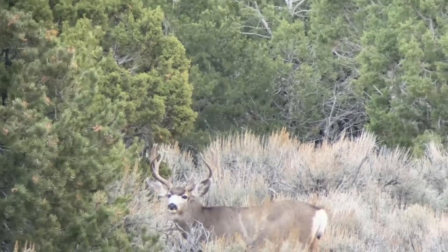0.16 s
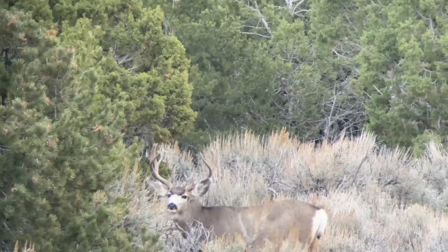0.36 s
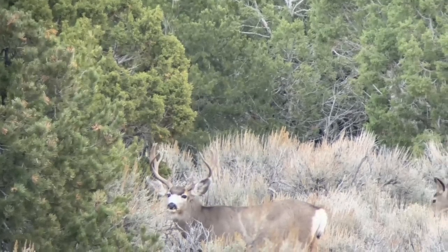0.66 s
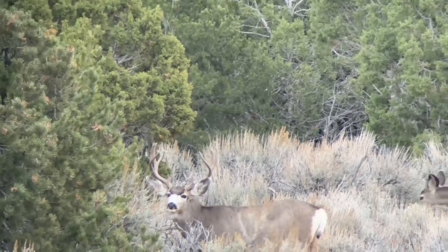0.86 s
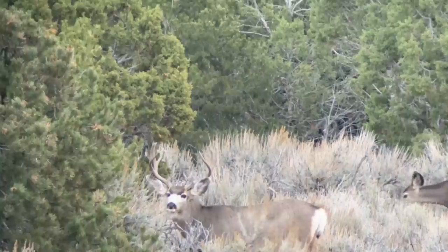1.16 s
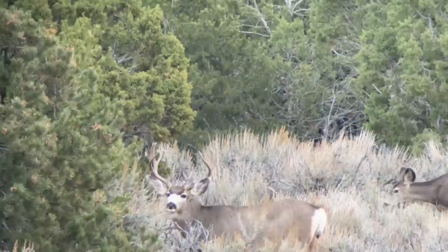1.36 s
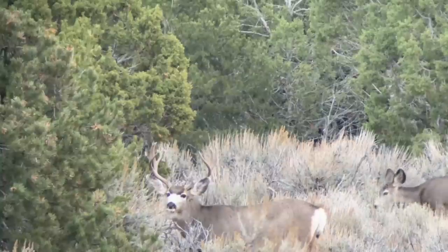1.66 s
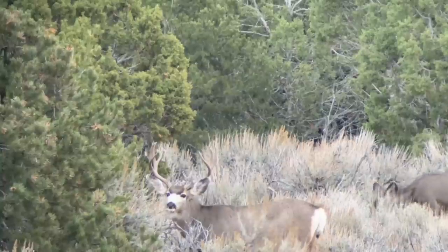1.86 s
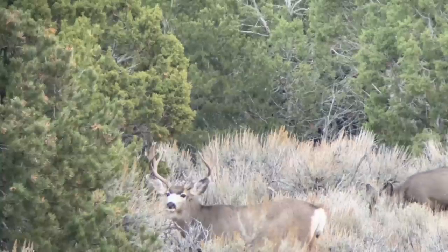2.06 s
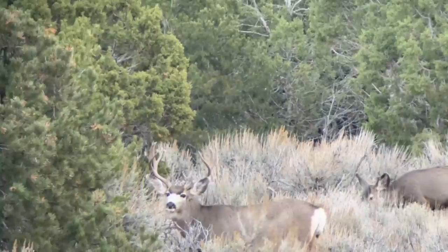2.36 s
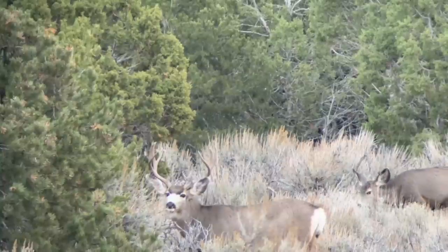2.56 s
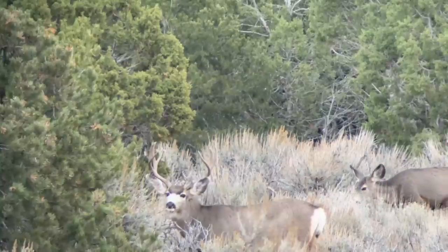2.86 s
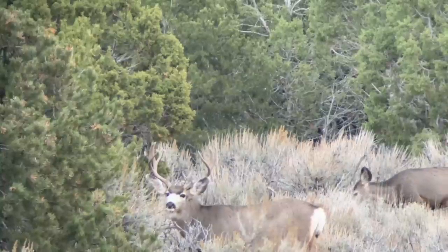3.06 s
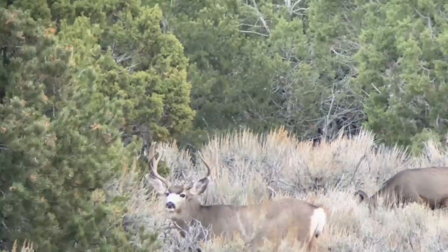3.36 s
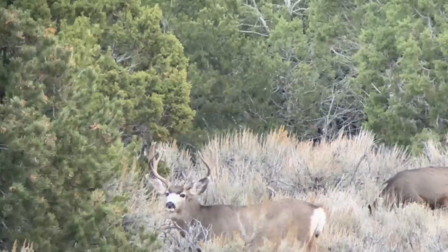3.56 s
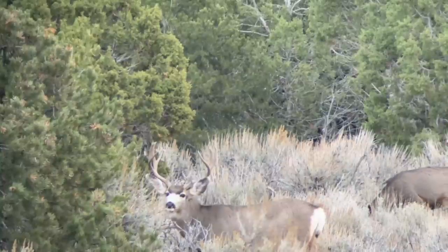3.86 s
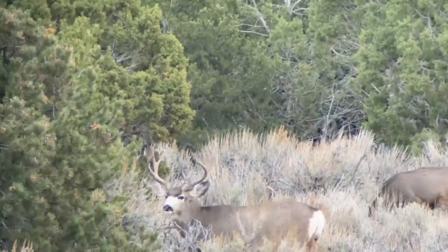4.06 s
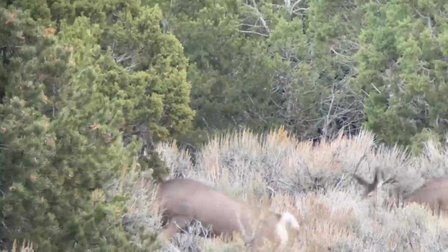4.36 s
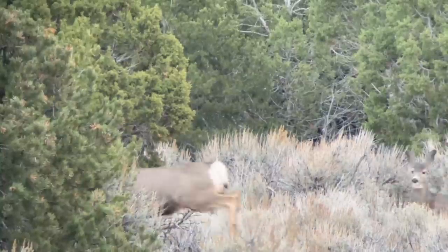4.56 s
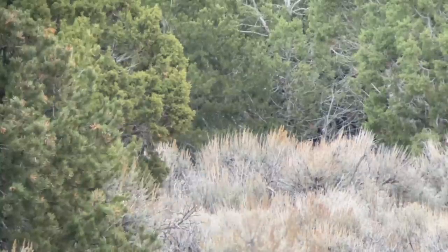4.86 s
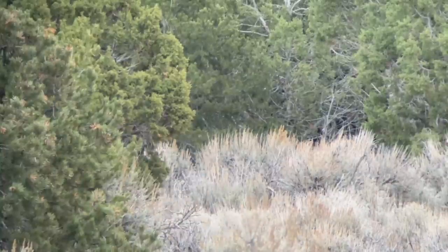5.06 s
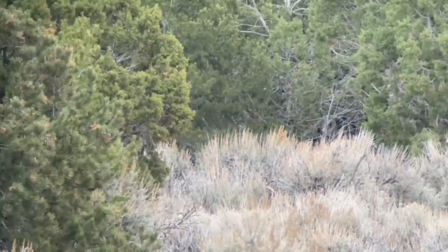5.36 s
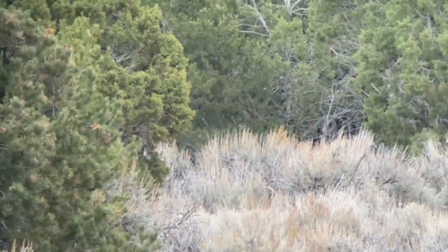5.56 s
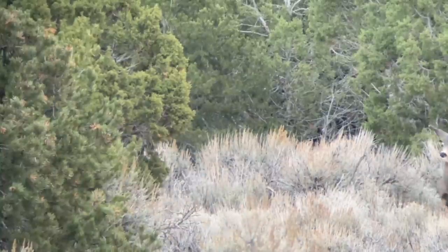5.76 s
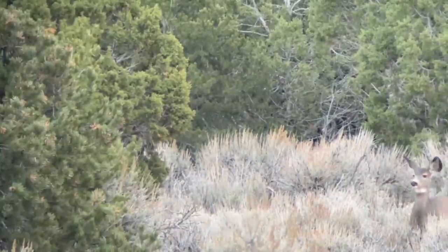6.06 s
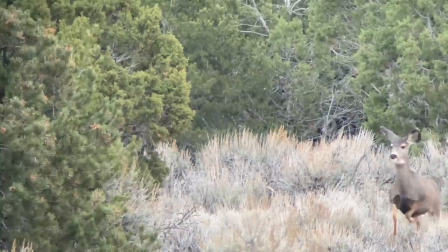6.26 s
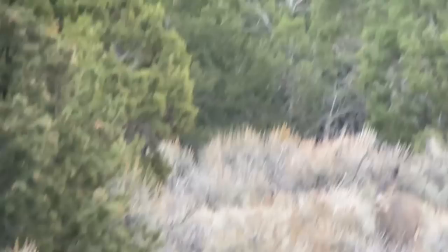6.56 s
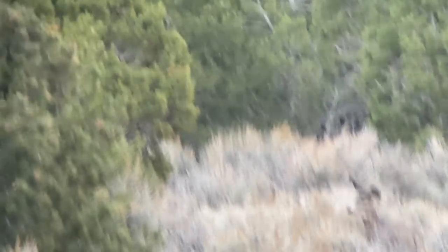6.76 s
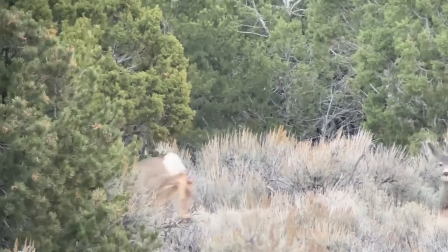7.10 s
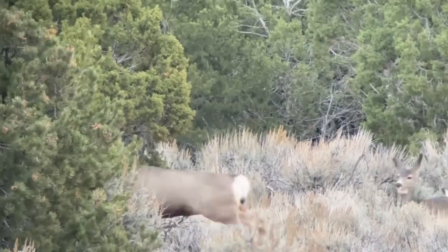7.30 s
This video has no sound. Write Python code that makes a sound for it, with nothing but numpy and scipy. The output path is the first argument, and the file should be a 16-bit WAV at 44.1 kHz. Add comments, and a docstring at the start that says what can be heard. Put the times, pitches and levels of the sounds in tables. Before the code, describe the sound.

A faint camera motor hums and hisses while light wind rumbles on the microphone outdoors. About four seconds in, a nearby muzzleloader fires once with a sharp crack and a deep thump. Echoes roll back from trees and slopes, with a dull, distant whack of the bullet among them. A sleeve rustles softly, and at the very end the echoes briefly swell backwards.

```python
"""A camera motor hums and hisses in light wind; then a muzzleloader fires once across brush country.
The bullet's shock wave cracks just before the powder gas blasts from the muzzle. Trees and slopes throw
the shot back, and the bullet strikes far off. A thin fizz lingers and a sleeve rustles.
At the end the sound plays backwards, running back into the echoes."""
import sys
import numpy as np
from scipy.fft import rfft, irfft, next_fast_len
from scipy.io import wavfile
from scipy.ndimage import map_coordinates

SR = 44100
rng = np.random.default_rng(int(sys.argv[2]) if len(sys.argv) > 2 else 0)


def materialize(psi):
    """Save the field psi as 16-bit PCM at rate SR to the path in sys.argv[1].

    A 1-D psi becomes a single channel; in a 2-D psi each row is a channel.
    """
    bounded = np.clip(np.atleast_2d(psi).T, -1, 1)
    quanta = np.round(bounded * 32767).astype(np.int16)
    wavfile.write(sys.argv[1], SR, quanta)


N = 327663

# the muzzle blast's pressure jumps, direct and off things nearby: (time [s], peak level [dB])
BLAST_FRONTS = [(3.9320, 0.5), (3.9332, -4.5), (3.9354, -12), (3.9372, -21.5), (3.9575, -21.5)]
# the bright part of an echo: (frequency [Hz], relative level [dB])
BRIGHT_TONE = [(1600, -22), (2000, -0.5), (2400, 4.5), (2700, 6), (3100, -1), (3700, -9), (4500, -14),
               (6000, -21), (6800, -19.5), (9500, -35), (15000, -67)]
# how alike left and right are, for the shot and for the quiet sounds: (frequency [Hz], likeness [0-1])
SHOT_ALIKE = [(130, 1), (300, 0.94), (640, 0.85), (1400, 0.98), (2800, 1), (7000, 0.98), (13000, .98)]
QUIET_ALIKE = [(40, 0.92), (90, 0.88), (200, 0.76), (500, 0.89), (1200, 1), (2200, .93), (4000, 0.88),
               (6000, 1), (13000, 0.88)]


def amp(db):
    """Turn decibels into a gain to multiply by."""
    return 10 ** (np.asarray(db) / 20)


def unit(x):
    """Scale x to an average power of 1."""
    return x / np.sqrt(np.mean(x ** 2) + 1e-20)


def clock():
    """The time of every sample, in seconds."""
    return np.arange(N) / SR


def since(start):
    """Seconds gone by since start; zero before it."""
    return np.maximum(clock() - start, 0)


def along(points, hz):
    """Read between (frequency, value) points on a logarithmic frequency scale."""
    freqs, values = np.transpose(points)
    return np.interp(np.log(hz + 1), np.log(freqs + 1), values)


def wobble(rate):
    """A smooth curve through rate random values a second."""
    return map_coordinates(rng.standard_normal(int(N * rate / SR) + 4), [clock() * rate])


def fading(start, rise, t60):
    """A loudness curve that rises at start, then falls 60 dB every t60 seconds."""
    age = since(start)
    return (1 - np.exp(-age / rise)) * np.exp(-np.log(1000) * age / t60)


def bursts(rows):
    """A loudness curve of short, sudden arrivals."""
    return sum(amp(db) * fading(s, rise=0.00089, t60=t60) for s, db, t60 in rows)


def bell(middle, width):
    """A smooth rise and fall."""
    return np.exp(-((clock() - middle) / width) ** 2 / 2)


def filtered(x, response):
    """Scale and shift each frequency in x by response(hz)."""
    size = 2 * next_fast_len(N // 2 + SR // 4)
    return irfft(rfft(x, size) * response(np.fft.rfftfreq(size, 1 / SR)), size)[..., :N]


def causal(gain):
    """A filter with this gain that never sounds before its cause."""
    cepstrum = irfft(np.log(np.maximum(gain, 1e-6)))
    half = len(cepstrum) // 2
    return np.exp(rfft(np.r_[cepstrum[0], 2 * cepstrum[1:half], np.zeros(half)]))


def noise(tone, alike, grain_db=0, grain_rate=300):
    """Stereo noise with the given tone; grain_db clumps it into separate little arrivals."""
    pair = rng.standard_normal((2, N)) * amp(grain_db * wobble(grain_rate))
    closed_tone = [(tone[0][0] / 2, -120), *tone, (tone[-1][0] * 2, -120)]

    def response(hz):
        spread = np.arccos(np.clip(along(alike, hz), -1, 1)) / 2
        return amp(along(closed_tone, hz)) * [np.cos(spread), np.sin(spread)]
    mid, side = filtered(pair, response)
    return unit(np.array([mid + side, mid - side]))


def shocks(fronts, response):
    """Sharp pressure jumps, each making the filter ring up to its own peak level."""
    click = np.eye(1, N)[0]
    ring = filtered(click, response)[:SR // 10]
    out = np.zeros(N)
    for s, db in fronts:
        out[round(s * SR):][:len(ring)] += amp(db) * ring / np.abs(ring).max()
    return out


def motor(turns_per_s=16.98, hum_db=-38, whirr_db=-54, hiss_db=-58, ease_db_per_s=4.6):
    """The camera's motor hums, whirrs and hisses twice a turn, once strongly and once weakly."""
    # the notes of the hum: (multiple of the motor's speed, relative level [dB])
    hum_notes = [(2, -23), (3, 0), (4, -4.5), (5, -20), (5.3, -16), (10, -19), (11, -25), (13, -27)]
    # the middle whirr and the high hiss: (frequency [Hz], relative level [dB])
    whirr_tone = [(250, 0), (380, 0), (520, -3.5), (700, -4.5), (810, -2), (1000, -10.5), (1150, -9.5),
                  (1330, -15.5), (1620, -7), (1830, -2.5), (2100, -10.5), (2400, -4.5), (2850, -9.5),
                  (3200, -19.5), (4200, -25)]
    hiss_tone = [(3500, -17.5), (4100, -12.5), (4800, 0), (6000, -2), (6700, 4), (7200, -1.5), (7700, 0),
                 (8000, 4), (8500, -7), (10000, -14.5), (13000, -27), (14800, -13.5), (16000, -17.5)]
    turns = turns_per_s * clock() + 0.0075 * wobble(1.1)
    hum = unit(sum(amp(db + 0.29 * wobble(1.3)) * np.sin(2 * np.pi * (multiple * turns + rng.random()))
                   for multiple, db in hum_notes))
    pulse = lambda phase, width=0.069: np.exp(-(np.sin(np.pi * phase) / (np.pi * width)) ** 2 / 2)
    pulsing = unit(1 + 1.46 * pulse(turns + .5) + 0.85 * pulse(turns) ** 2)
    hiss_level = amp(hiss_db - ease_db_per_s * since(5.7))  # steady, then easing off
    hiss = hiss_level * pulsing * noise(hiss_tone, QUIET_ALIKE)
    whirr = amp(whirr_db) * (1 + 0.065 * pulse(2 * turns)) * noise(whirr_tone, QUIET_ALIKE)
    return amp(hum_db) * hum + whirr + hiss


def wind(boost_db=9.5, low_cut_hz=38):
    """Light air rumbles on the microphone, with nothing in the deepest bass."""
    # the breeze, one list before the shot and one after: (time [s], level before the boost [dB])
    breeze = [
        [(0.0, -47), (1.83, -52), (2.95, -52), (3.35, -47), (3.8, -49)],
        [(5.4, -49), (5.59, -51), (6.3, -49.5), (6.78, -51.5), (7.0, -59)],
    ]
    # its rumble: (frequency [Hz], relative level [dB])
    rumble_tone = [(18, -42), (30, -7), (45, 0), (62, 4), (85, -3.5), (130, -9.5), (180, -14.5), (240, -24),
                   (350, -35.5)]
    times, levels_db = np.vstack(breeze).T
    level = amp(np.interp(clock(), times, levels_db) + boost_db + 1.2 * wobble(7))
    rumble = level * noise(rumble_tone, QUIET_ALIKE)
    return filtered(rumble, lambda hz: hz ** 6 / (hz ** 6 + low_cut_hz ** 6))


def crack(high_cut_hz=7000):
    """The bullet's shock wave makes the microphone's housing ring."""
    # shocks from the bullet's nose and tail, then off the ground: (time [s], peak level [dB])
    fronts = [(3.9136, -7), (3.9140, -8.5), (3.9167, -9.5)]
    # where the housing rings: (frequency [Hz], width [Hz], relative level [dB])
    rings = [(402, 530, -12.5), (1450, 92, 3), (2530, 330, -2), (5270, 290, -25), (8300, 900, -17)]

    def housing(hz):
        ringing = sum((-1) ** k * amp(db) * 1j * hz * width / (centre ** 2 - hz ** 2 + 1j * hz * width)
                      for k, (centre, width, db) in enumerate(rings))
        return ringing * causal(1 / (1 + (hz / high_cut_hz) ** 4))
    return shocks(fronts, housing)


def brush():
    """Nearby brush scatters first the crack, then the blast."""
    # what the brush throws back: (frequency [Hz], relative level [dB])
    tone = [(150, -30), (250, -8), (315, -17), (400, 0), (600, -6), (780, -18), (988, -17), (1530, -13),
            (1700, -23), (2810, -13), (5930, -23.5), (8260, -18.5), (10000, -27.5), (10700, -79),
            (11900, -44), (14700, -47), (16000, -62)]
    from_crack = amp(-24.5) * fading(3.914, rise=0.001, t60=0.031)
    from_blast = amp(-30) * fading(3.936, rise=0.0071, t60=0.55)
    return (from_crack + from_blast) * noise(tone, SHOT_ALIKE, grain_db=3)


def blast():
    """Powder gas leaves the muzzle with sharp shocks and a short rush."""
    # the muzzle blast: (frequency [Hz], relative level [dB])
    tone = [(100, -16), (320, -18.5), (410, 7), (570, 8), (760, -14.5), (1020, 0.5), (1500, 0),
            (1850, -17.5), (2650, 5), (3700, -15.5), (5600, -19.5), (6700, -9.5), (9500, -14.5),
            (16000, -44.5)]
    bang = shocks(BLAST_FRONTS, lambda hz: causal(amp(along(tone, hz))))
    gas = amp(-5) * fading(3.9318, rise=0.00082, t60=0.018) * noise(tone, SHOT_ALIKE)
    return bang + gas


def boom(split_hz=182, dulling_db_per_s=14.5):
    """The low boom rolls away round the valley, ever deeper; a few slopes send it back."""
    # the rolling boom: (frequency [Hz], relative level [dB])
    tone = [(45, -32), (70, -12), (100, -3), (150, 0.5), (205, -1.5), (240, -14.5), (285, -27.5),
            (340, -35), (480, -54)]
    # slopes returning it in one piece: (time [s], level [dB])
    slopes = [(4.086, -24), (4.282, -25.5), (4.555, -30.5), (4.636, -30.5)]
    fired = BLAST_FRONTS[0][0]
    level = amp(-24) * fading(fired, rise=0.0066, t60=2.35)
    returns = sum(amp(db) * bell(s, width=0.011) for s, db in slopes)
    roll = noise(tone, SHOT_ALIKE)
    deep = filtered(roll, lambda hz: 1 / (1 + (hz / split_hz) ** 8))
    upper_gain = amp(3.5 - dulling_db_per_s * since(fired))  # starts stronger, dies sooner
    return np.hypot(level, returns) * (deep + upper_gain * (roll - deep))


def bark(start=3.9325, rise=0.00045):
    """A short, hollow ring follows the blast's first shock."""
    # the muzzle's notes: (frequency [Hz], level [dB], time to fade 60 dB [s])
    notes = [(383, -25, 0.11), (445, -11.5, 0.045), (644, -13.5, 0.051)]
    age = since(start)
    return sum(amp(db) * np.sin(2 * np.pi * hz * age) * fading(start, rise, t60) for hz, db, t60 in notes)


def thump(start=3.9386, high_hz=190, low_hz=42, glide_s=0.012, rise=0.0051, t60=0.058, db=7.5):
    """A low thump slides quickly down in pitch and dies away."""
    age = since(start)
    hz = low_hz + (high_hz - low_hz) * np.exp(-age / glide_s)
    cycles = np.cumsum(hz * (age > 0)) / SR
    return -amp(db) * np.sin(2 * np.pi * cycles) * fading(start - rise, rise, t60)


def echoes(bright_db=14, dulling_db_per_s=30):
    """Trees return the shot; the longer an echo travels, the more treble the air takes from it."""
    # groups of trees: (time [s], level then [dB], time to swell 60 dB [s], time to fade 60 dB [s])
    # a negative swell time makes that echo fade from the outset
    groves = [(4.03, -51.5, -2.8, 0.76), (4.27, -33, 1, 1.19), (4.555, -31, 0.69, 0.49),
              (4.85, -44.5, 0.9, 1.17)]
    # single trees, each with a sharp echo: (time [s], level [dB])
    trees = [(4.178, -25.5), (4.212, -24.5), (4.225, -25), (4.2517, -22), (4.273, -30), (4.309, -24),
             (4.501, -23.5), (4.532, -20.5), (4.554, -24), (4.7362, -28.5), (4.7762, -32), (4.808, -32.5),
             (4.8435, -31), (4.867, -33), (4.928, -35.5)]
    # the dull part of an echo: (frequency [Hz], relative level [dB])
    dull_tone = [(300, -45), (550, -11.5), (760, -15.5), (950, -2.5), (1120, -3), (1270, -8.5), (1420, 5.5),
                 (1640, 1.5), (1850, -17.5), (2600, -17), (3500, -30)]
    t = clock()
    delay = since(BLAST_FRONTS[0][0])
    brightness = amp(bright_db - dulling_db_per_s * delay)
    dull = noise(dull_tone, SHOT_ALIKE, grain_db=2, grain_rate=110)
    bright = noise(BRIGHT_TONE, SHOT_ALIKE, grain_db=3, grain_rate=460)
    grove_power = sum(amp(db - 60 * np.maximum((s - t) / rise, (t - s) / t60)) ** 2
                      for s, db, rise, t60 in groves)
    scattered = (delay > 0) * np.sqrt(grove_power) * (dull + brightness * bright)
    tree_level = bursts([(s, db, 0.028) for s, db in trees])  # each dies in 28 ms
    tree_noise = noise(dull_tone, SHOT_ALIKE) + brightness * noise(BRIGHT_TONE, SHOT_ALIKE)
    return scattered + tree_level * tree_noise


def strike():
    """The bullet lands far off with a dull, gritty whack."""
    # its quick knocks: (time [s], level [dB], time to fade 60 dB [s])
    knocks = [(4.625, -15.5, 0.033), (4.630, -19, 0.033), (4.640, -21.5, 0.037)]
    # the whack: (frequency [Hz], relative level [dB])
    tone = [(180, -55), (300, -32), (500, -11.5), (703, -10.5), (863, -2), (1140, 6), (1260, -21),
            (1440, -0.5), (2270, -16), (2520, -9.5), (3050, -6.5), (3580, -24.5), (5020, -28), (7570, -42),
            (8260, -45), (10000, -57), (13000, -86), (22000, -120)]
    return bursts(knocks) * noise(tone, SHOT_ALIKE)


def tick(start=5.031, db=-38, t60=0.033):
    """One faint, bright tick as the echoes die."""
    return bursts([(start, db, t60)]) * noise(BRIGHT_TONE, SHOT_ALIKE)


def fizz(start=5.08, rise=0.07, stop=6.35, t60=1.6, db=-73, flicker_db=1.5):
    """A thin, high fizz sets in after the shot, flickers and fades."""
    # the fizz: (frequency [Hz], relative level [dB])
    tone = [(12000, -20), (13500, -2), (15000, -6.5), (16000, -4)]
    fade_in = 1 - np.exp(-since(start) / rise)
    fade_out = np.exp(-np.log(1000) * since(stop) / t60)
    return amp(db - flicker_db * wobble(9)) * fade_in * fade_out * noise(tone, QUIET_ALIKE)


def sleeve():
    """Smooth cloth slides in a few short strokes."""
    # the strokes: (middle time [s], level [dB], half-length [s])
    strokes = [(6.453, -61, 0.061), (6.573, -53, 0.025), (6.688, -59.5, 0.029), (6.91, -50, 0.051)]
    # sliding cloth: (frequency [Hz], relative level [dB])
    tone = [(1760, -40), (3000, -12), (4110, -5), (8050, 4.5), (9730, -2.5), (10400, -8), (10800, -51),
            (12900, -7), (16000, -12)]
    level = sum(amp(db) * bell(s, width) for s, db, width in strokes)
    return level * noise(tone, QUIET_ALIKE, grain_db=-0.5)


def microphone(x, table):
    """The microphone's two openings hear x at different levels and timings; their sum keeps its tone."""
    def response(hz):
        centres, leans_db, leads = np.transpose(table)
        lean_db = along(np.c_[centres, leans_db], hz)
        lead = along(np.c_[centres, np.clip(leads, -2.6, 2.6)], hz)
        side = np.array([[.5], [-.5]])
        pair = amp(side * lean_db) * np.exp(1j * side * lead)
        return pair / pair.mean(axis=0)
    return filtered(x, response)


def scene():
    """The shot and its echoes, over the small sounds at the camera."""
    # how the rifle and the close sounds reach the two openings:
    # (frequency [Hz], left minus right [dB], left's lead [radians])
    rifle_paths = [(220, -.5, 0), (400, -5, .4), (620, 1.5, 0.82), (810, -5, 0.3), (1060, 2, 0),
                   (1300, -9, -0.99), (1580, -2, -.4), (1800, -5, -2.3), (2150, 0.5, .3), (3200, 1.5, 0.76),
                   (5000, 0.5, 0.23), (7100, 6, 0.68), (7900, 0, -1.6), (9000, -2.5, 0.19),
                   (10500, 0.5, -1.5), (13000, -2.5, -.2)]
    close_paths = [(180, -1, 0), (380, -1, 0.57), (780, 6.5, 1.2), (1280, -0.5, 2.5), (1800, -14.5, 1.8),
                   (2100, -0.5, -0.4), (2800, 1.2, 0.76), (4200, -1, -0.3), (7000, 5, 1.06),
                   (7720, 3, -1.97), (9070, -3, 1), (10500, 4, -2), (13000, 0, 0.15)]
    rifle = crack() + blast() + bark() + thump() + brush() + boom() + echoes() + tick() + strike()
    close = motor() + sleeve() + fizz()
    return microphone(rifle, rifle_paths) + microphone(close, close_paths) + wind()


def record(dry, ceiling=0.9, turn_s=7.005, crossfade_s=0.012, mirror_s=11.9124, top_hz=15800):
    """The camera rounds off the blast's peak; from turn_s on, the sound runs backwards, softer."""
    left, right = dry / (1 + np.abs(dry / ceiling) ** 4) ** (1 / 4)
    # the microphone's openings cancel each other in two treble bands
    dip = lambda hz, centre_hz, width_hz, db: db * np.exp(-((hz - centre_hz) / width_hz) ** 2)
    notches = lambda hz: causal(amp(dip(hz, 7496, 140, -27.5) + dip(hz, 11230, 775, -40.5)))
    mid = filtered((left + right) / 2, notches)
    side = (left - right) / 2
    heard = np.array([mid + side, mid - side])
    mirrored = np.minimum(round(mirror_s * SR) - np.arange(N), N - 1)  # time t plays mirror_s - t
    backwards = amp(-3.5) * heard[:, mirrored]
    turned = np.clip((clock() - turn_s) / crossfade_s + .5, 0, 1)
    return filtered((1 - turned) * heard + turned * backwards, lambda hz: hz < top_hz)


dry = scene()
out = record(dry)
materialize(out)
```